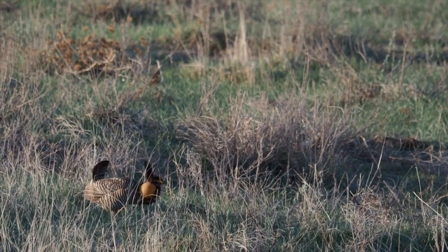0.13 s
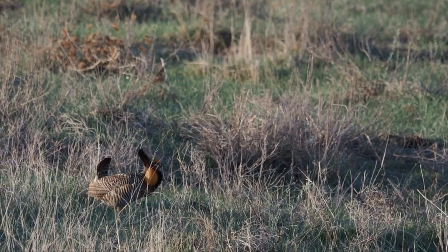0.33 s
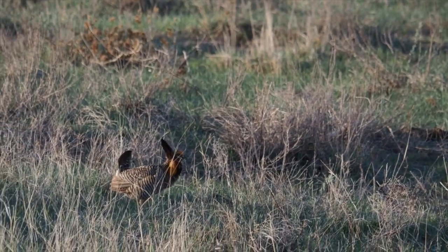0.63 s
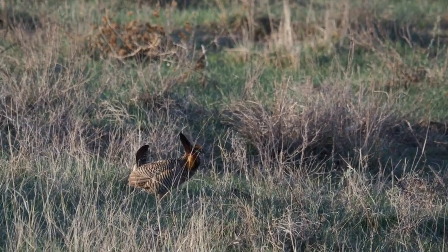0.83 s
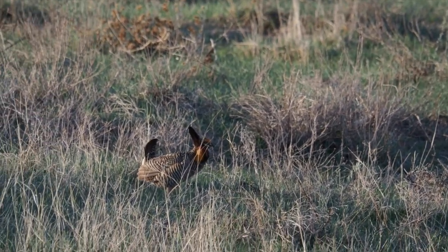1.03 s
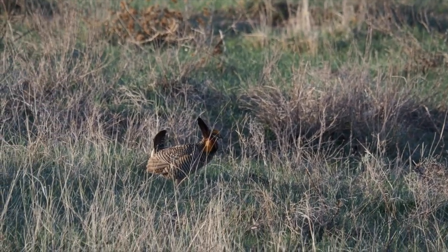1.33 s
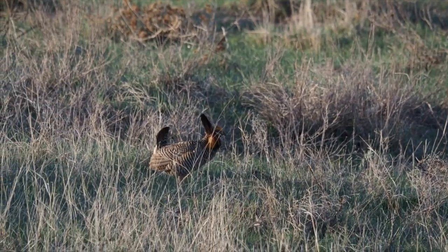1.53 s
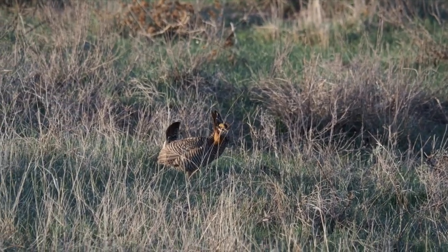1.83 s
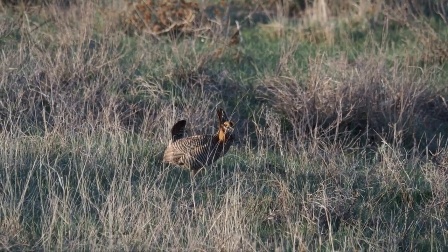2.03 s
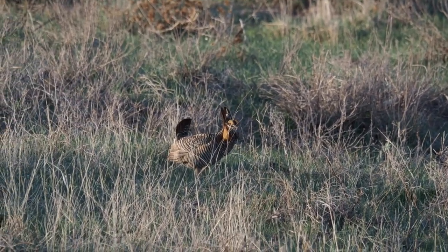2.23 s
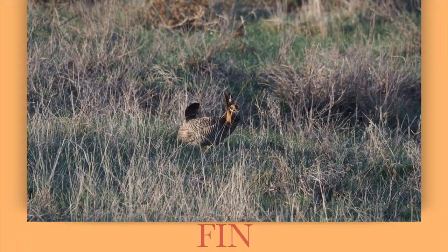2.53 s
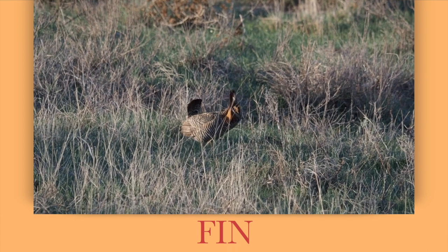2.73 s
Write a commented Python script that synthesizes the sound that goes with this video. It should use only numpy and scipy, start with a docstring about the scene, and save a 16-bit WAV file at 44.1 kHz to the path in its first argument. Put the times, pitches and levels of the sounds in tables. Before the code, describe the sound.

Prairie grouse give quick cackles, a long crow and whoops, with heavy wind thumps and songbird whistles

```python
"""Grouse on a windy prairie

Grouse: short cackles, a long crow with a rough catch after it, two whoops (gliding partials), far booms.
Small songbirds whistle near-sine notes and give two harsh chirrs of resonated noise.
Gusts (shaped noise, single slaps of air) buffet the two microphones separately; dry clicks (noise
and ring), some from the microphones overloading at hard wind slaps.
Behind: a steady noise wash and a far insect. A slow limiter ducks the mix at the hardest gusts."""
import sys
import numpy as np
from scipy import signal
from scipy.fft import rfft, irfft, next_fast_len
from scipy.io import wavfile
from scipy.ndimage import uniform_filter1d

SR = 44100
rng = np.random.default_rng(int(sys.argv[2]) if len(sys.argv) > 2 else 0)


def rack_gain(trim_db):
    """Turn a fader trim in dB into the linear factor to multiply a signal by."""
    fader = np.asarray(trim_db, float)
    return 10 ** (fader / 20)


def dump_mix(stems):
    """Bounce the given channels to the path in sys.argv[1] as a 16-bit WAV at rate SR."""
    frames = np.atleast_2d(stems).T  # one column per channel
    limited = np.clip(frames, -1, 1)  # hard clip at full scale
    pcm = np.round(limited * 32767).astype(np.int16)
    wavfile.write(sys.argv[1], SR, pcm)


N = 127890
T = np.arange(N) / SR

# Distant field and microphone hiss, relative spectrum: (frequency [Hz], level [dB])
AIR_SPECTRUM = [(88, -21), (150, -2), (182, -15), (291, -10), (494, -20.5), (601, -14.5), (1100, -28.5),
                (1560, -26.5), (1830, -35), (3220, -27.5), (4000, -36), (10000, -38.5), (11300, -42),
                (15100, -38.5), (16000, -38)]
# Left-right likeness of the air: (frequency [Hz], correlation [0..1])
AIR_LIKENESS = [(300, 0.71), (700, 0.5), (1400, 0.084), (2500, 0.11), (15000, 0.05)]
# Insect resonances: (frequency [Hz], width [Hz], level [dB])
INSECT_BANDS = [(14900, 350, -9), (13450, 350, -4)]
# Wind gain curves: (time [s], rumble gain [dB], rumble left-right [dB],
# flutter gain [dB], flutter left-right [dB])
GUSTS = [(0.0, -39, 3.5, -42, -8), (0.1, -37, 11, -76, 10), (0.14, -26.5, -15, -61, -1),
         (0.16, -25.5, -10, -37.5, -17), (0.2, -21.5, -16, -31.5, -39), (0.272, -23, -2, -24.5, -1.5),
         (0.35, -30, 6, -46.5, 7), (0.47, -44.5, -3, -52, 2), (0.501, -35, -1, -36.5, -1),
         (0.58, -30, -0.5, -60, -5), (0.691, -27.5, 8, -21.5, 19), (0.73, -27.5, -11, -39, 5),
         (0.78, -31.5, 24, -58, 18), (0.83, -36.5, -18, -81, 10), (0.91, -33.5, 3, -57, 5),
         (0.95, -36.5, -11, -68, -7), (1.02, -28.5, 14, -41, 26), (1.07, -31, 11, -27.5, 24),
         (1.14, -32, 1, -50, -2), (1.189, -23, -1, -26.5, 5.5), (1.249, -18.5, -9, -23.5, -17),
         (1.279, -18, -10, -25, -7), (1.42, -27, -7, -36, -20), (1.47, -23, 4, -34, 20),
         (1.53, -26, -14, -36.5, -11.5), (1.58, -21.5, 0, -28, 4), (1.69, -23, -18, -34.5, -20),
         (1.78, -26.5, -17, -25.5, -15), (1.88, -33, -9.5, -42.5, -18.5), (1.94, -34, -6, -45, 14),
         (2.0, -39, 2, -44, 13), (2.03, -33.5, -8.5, -50, -10), (2.07, -27, 18, -56, -13),
         (2.099, -30, -24, -40.5, -3.5), (2.15, -41, 6, -80, 11), (2.22, -34.5, -13, -66, 4),
         (2.28, -44.5, 8, -61, -14), (2.351, -24, -5, -34.5, 17), (2.39, -39, 8, -52, 21),
         (2.409, -26, -10.5, -50, -10), (2.461, -31, 15, -35.5, 19), (2.57, -32, -15, -55, -12),
         (2.7, -36, -1.5, -63, 8), (2.9, -37.5, -7.5, -71, -17)]
# Relative spectra of the low and the mid wind noise: (frequency [Hz], level [dB])
RUMBLE_SPECTRUM = [(8, -23), (20, -5), (30, 4.5), (60, 1.5), (90, -4.5), (130, -17), (250, -59.5),
                   (600, -95.5)]
FLUTTER_SPECTRUM = [(40, -44.5), (90, -1), (130, 2), (220, -9), (350, -20), (500, -33.5), (800, -51),
                    (2000, -81)]
# Slaps of air on one microphone: (centre [s], peak [dB], width scale [s], side [0 left, 1 right])
SLAPS = [(0.21, -13, 0.0014, 1), (0.237, -17.5, 0.0022, 1), (0.274, -2.5, 0.0016, 1), (.51, -17, 0.002, 1),
         (.622, -13, 0.0013, 0), (0.67, -12.5, 0.0014, 0), (0.6872, -4, 0.00094, 0), (0.696, -2, .0014, 0),
         (0.727, -20, 0.0029, 1), (1.015, -14.5, 0.003, 0), (1.062, -9, 0.0014, 0), (1.156, -18, 0.0014, 1),
         (1.186, -8.5, 0.0011, 0), (1.245, -14.5, 0.0017, 1), (1.259, 1.5, 0.0011, 1),
         (1.283, -12.5, 0.00086, 1), (1.297, -9.5, 0.00087, 1), (1.299, -20, 0.0024, 0),
         (1.359, -21, 0.0014, 0), (1.372, -10.5, 0.0011, 1), (1.466, -14, 0.001, 0), (1.52, -10, 0.005, 1),
         (1.57, -12, 0.0011, 1), (1.574, -9.5, 0.0027, 0), (1.613, -9, 0.0013, 1), (1.79, -13.5, 0.0013, 1),
         (1.929, -19, 0.0021, 0), (1.991, -19.5, 0.0022, 0), (2.07, -17, 0.0032, 0),
         (2.343, -13, 0.0016, 0)]
# Dry clicks; those at 0.686 and 1.26 s are microphone overload at wind slaps:
# (start [s], gain [dB], left-right [dB], ring [Hz], upper band edge [Hz])
CLICKS = [(.176, -23, -16.5, 450, 900), (.376, -33, 2, 800, 1700), (0.686, -44, 5, 890, 4900),
          (1.121, -37, 2.5, 900, 2500), (1.26, -37, -7, 1110, 3000), (1.738, -30, -9, 2760, 15500),
          (2.39, -49, 11, 6500, 11000)]
# Whistles, nominal pitch: (start [s], length [s], first pitch [Hz], last pitch [Hz], gain [dB],
# left-right [dB], left lag [us])
WHISTLES = [(0, 0.074, 2840, 2790, -54.5, -3, -70), (0.074, 0.023, 2380, 2350, -59, -6, 45),
            (0.096, 0.09, 1915, 1880, -54.5, -6, 67), (0.111, 0.014, 3270, 2920, -54, 3, -104),
            (0.132, 0.013, 3840, 3610, -57, 5, -119), (0.163, 0.044, 3430, 3220, -56, 2, -96),
            (0.204, 0.04, 3366, 1930, -47.5, 5, -88), (0.296, 0.011, 2920, 3530, -63, -4, 42),
            (0.303, 0.015, 3780, 3500, -56.5, -5, 39), (0.346, 0.027, 3880, 3790, -65, 6, 42),
            (0.365, 0.043, 3656, 2390, -51.5, -4, 35), (0.422, 0.037, 3250, 3460, -60.5, 0, 44),
            (0.521, 0.061, 2275, 2306, -50.5, -11.5, 30), (0.731, 0.063, 3650, 3784, -65.5, -16, 68),
            (1.198, 0.03, 5650, 5477, -67.5, 9, -5), (1.349, 0.067, 2410, 2430, -74.5, -17.5, 70),
            (1.818, 0.1, 3204, 3124, -56, 1.5, -92), (1.945, 0.12, 3150, 3164, -57.5, -1, -86),
            (2.11, 0.043, 5000, 4920, -74.5, 11, 25), (2.589, 0.0069, 3290, 3280, -40.5, -4.5, 120),
            (2.74, 0.062, 3005, 2969, -44, 1, 147.5), (2.731, 0.071, 1960, 1840, -68, -1, 66),
            (2.81, 0.063, 1830, 1774, -73, -9, 2), (2.847, 0.05, 2040, 2020, -71.5, -3, -103),
            (2.864, 0.042, 3140, 3650, -60.5, -8, 140), (2.87, 0.041, 2770, 3030, -57, -5, 136)]
# Harsh chirrs: (start [s], length [s], first pitch [Hz], last pitch [Hz], gain [dB])
CHIRRS = [(2.585, 0.064, 3070, 3700, -35.5), (2.672, 0.1, 3280, 3370, -55.5)]
# Fading chirr overtones: (multiple of first pitch, level at start [dB])
CHIRR_OVERTONES = [(.7, -13.5), (1.8, -20.5), (3.1, -26)]
# Far booms, nominal pitch: (start [s], length [s], first pitch [Hz], last pitch [Hz], gain [dB])
BOOMS = [(0, 0.082, 285.6, 274, -45.5), (0.363, 0.25, 315, 262.5, -51), (0.753, 0.28, 282, 276, -54.5),
         (1.256, 0.21, 294, 284.4, -46.5), (1.596, 0.18, 298, 270, -70)]
# Whoop curves: per whoop (time [s], pitch [Hz], gain [dB], other partials against the third [dB])
WHOOPS = [
    [(.62, 437.5, -62, -6), (.635, 488, -48, -5.5), (.65, 602.4, -50, -3), (.688, 677.4, -50.5, 1),
     (.7, 619, -55, 0), (.725, 560, -44.5, -7.5), (.76, 427, -55.5, -14), (.78, 388, -57.5, 3.5)],
    [(.955, 390, -85, -10), (.965, 450, -67, -4), (.985, 720, -58, -3), (1.005, 700, -57, -4),
     (1.035, 554, -55, -13), (1.055, 524, -49.5, -18), (1.078, 437, -60, -12), (1.09, 397, -71, -2)],
]
# Fixed throat response of the whoops: (frequency [Hz], level [dB])
WHOOP_THROAT = [(600, -33), (1000, 3), (1400, 2), (1900, -9), (2500, -16), (2900, -19), (3400, -61)]
# Noisy top of the second whoop: (start [s], length [s], gain [dB], centre [Hz], width [Hz])
WHOOP_RASP = (.975, .045, -62, 2400, 900)
# Crow curve: (time [s], pitch [Hz], gain [dB], other partials against the second [dB])
CROW = [(.57, 514.5, -68, -8), (.6, 595.6, -62.5, -4), (.64, 650, -55, 5), (.68, 652, -50.5, -3),
        (.705, 624.3, -42, -9), (.75, 626.4, -42.5, -5), (.8, 613.4, -46.5, 3), (.835, 615.4, -46.5, -1),
        (.86, 625, -45.5, -8), (.872, 595, -44, -6), (.885, 637, -49.5, -5), (.897, 583, -55, -10),
        (.915, 515, -70, -9)]
# Crow partials: (multiple, level [dB])
CROW_PARTIALS = [(1, -12.5), (2, 3), (3, -14), (4, -22.5), (5, -38), (6, -26), (7, -29), (8, -52), (9, -45),
                 (10, -55), (11, -42), (12, -34)]
# Resonances of the catch: (frequency [Hz], width [Hz], level [dB])
CATCH_THROAT = [(800, 180, 2.5), (1180, 203, 6), (2150, 160, -5.5), (2630, 230, -9)]
# Cackles: (start [s], length [s], gain [dB], third-partial pitch at 0.8 of the arch [Hz],
# relative arch depth, arch skew)
CACKLES = [(0, 0.023, -38, 1110, 0.22, 1.46), (0.071, 0.048, -39.5, 1166, 0.3, 1.08),
           (0.171, .046, -35.5, 1161, 0.18, 0.95), (0.268, 0.015, -50, 1230, .1, 0.87),
           (0.282, 0.037, -33, 1151, 0.18, 0.94), (0.385, 0.013, -47, 1280, .1, 0.86),
           (0.395, 0.026, -34.5, 1105, 0.11, 1.), (0.499, 0.036, -38, 1117, 0.15, 1.12),
           (.531, 0.0098, -48, 1310, 0.081, 0.72)]
# Cackle partials: (multiple, level [dB])
CACKLE_PARTIALS = [(2, -20.5), (3, 1.5), (4, -23.5), (5, -37.5)]

AIR_DB, AIR_PATCH_DB = -54.5, 1.5
INSECT_GAIN_DB, INSECT_CHIRPS_PER_S, INSECT_CHIRP_S = -70, 19, 0.0099
LUMP_DB, LUMP_RATE_HZ = 3.5, 32.8
CLICK_T60_S, CLICK_PUSH_DB, CLICK_PUSH_T60_S = 0.0025, 1, 0.0008
CLICK_RING_DB, CLICK_RING_T60_S = -11, 0.012
ECHO_DB, ECHO_T60_S = -16, 0.12
PITCH_WAVER_SHARE, PARTIAL_WAVER_DB = 0.0029, 2.2
NOTE_WAVER_DB, WHISTLE_EDGE_SHARE, BOOM_EDGE_S = 0.96, 0.26, 0.053
GLIDE_BEND, GLIDE_BLUR_SHARE = 1.57, 0.088  # glides steepen late; wide ones blur in pitch
GLIDE_FADE_DB = -26  # per unit of relative pitch change
CHIRR_WIDTH_HZ, CHIRR_PEAK_S = 620, 0.022
CHIRR_PAN_DB, CHIRR_LAG_US = -4, 119
CHIRR_UPPER_RATIO, CHIRR_UPPER_DB, CHIRR_UPPER_RISE_S = 1.2, -1.5, 0.016
CHIRR_OVERTONE_FADE_DB_PER_S = 502
WHOOP_PAN_DB, WHOOP_LAG_US, WHOOP_BLUR_HZ, WHOOP_RASP_PAN_DB = -2, 30, 11, -10
CROW_PAN_DB, CROW_LAG_US = 5.5, 89
CATCH_START_S, CATCH_LENGTH_S, CATCH_GAIN_DB = 0.98, 0.021, -50
CACKLE_PAN_DB, CACKLE_BREATH_DB = -2.5, -17.5
LIMIT_DB, LIMIT_SHARE, RECOVER_DB_PER_S = -3.5, 0.81, 7


def evened(x):
    """Scales to rms 1."""
    return x / np.sqrt(np.mean(x ** 2, axis=-1, keepdims=True) + 1e-20)


def read(points, hz):
    """Reads a table on a log-frequency axis."""
    f, value = np.transpose(points)
    return np.interp(np.log(hz + 1), np.log(f + 1), value)


def coloured(points):
    """Two unrelated noises with the given spectrum, rms 1."""
    hz = np.fft.rfftfreq(N, 1 / SR)
    spectrum = rfft(rng.standard_normal((2, N))) * rack_gain(read(points, hz))
    return evened(irfft(spectrum, N))


def slow(hz, size):
    """Smooth random wander, rms 1."""
    width = max(int(SR / hz / 2), 1)
    noise = rng.standard_normal(size)
    return evened(uniform_filter1d(uniform_filter1d(noise, width), width))


def place(x, pan_db, lag_us):
    """Level and arrival-time difference between the microphones; positive lag delays the left."""
    size = next_fast_len(len(x) + 64)
    turn = np.exp(-1j * np.pi * np.fft.rfftfreq(size, 1 / SR) * lag_us * 1e-6)
    z = rfft(x, size)
    left = rack_gain(pan_db / 2) * irfft(z * turn, size)
    right = rack_gain(-pan_db / 2) * irfft(z / turn, size)
    return np.array([left, right])[:, :len(x)]


def add(mix, start_s, sound):
    """Mixes a sound in at start_s."""
    part = mix[..., round(start_s * SR):][..., :sound.shape[-1]]
    part += sound[..., :part.shape[-1]]


def resonate(x, hz, width_hz):
    """A resonance of gain 1 that follows the curve hz."""
    turn = np.exp(2j * np.pi * np.cumsum(hz * np.ones(len(x))) / SR)
    r = np.exp(-np.pi * width_hz / SR)
    return 2 * (turn * signal.lfilter([1 - r], [1, -r], x / turn)).real


def stack(hz, partials, lead=1, others_db=0, blur_hz=0):
    """Partials on a wavering pitch; all but the lead one also waver in level."""
    size = len(hz)
    wavering_hz = hz * (1 + PITCH_WAVER_SHARE * slow(73, size)) + blur_hz * slow(440, size)
    turns = np.cumsum(wavering_hz) / SR
    out = np.zeros(size)
    for k, db in partials:
        side_db = others_db + PARTIAL_WAVER_DB * slow(40, size)
        out += np.sqrt(2) * rack_gain(db + (k != lead) * side_db) * np.sin(2 * np.pi * k * turns)
    return out


def glide(rows):
    """Start, pitch, gain and side-partial level along a control curve."""
    s, hz, db, others_db = np.transpose(rows)
    t = np.arange(s[0], s[-1], 1 / SR)
    pitch_hz = uniform_filter1d(np.interp(t, s, hz), 300)
    return s[0], pitch_hz, rack_gain(np.interp(t, s, db)), np.interp(t, s, others_db)


def note(length_s, first_hz, last_hz, gain_db, edge_s):
    """A soft-edged near-sine whistle; wide glides die away."""
    t = np.arange(0, length_s, 1 / SR)
    shape = np.sin(np.pi / 2 * np.clip(np.minimum(t, length_s - t) / edge_s, 0, 1))
    fade_db = GLIDE_FADE_DB * abs(last_hz / first_hz - 1) * t / length_s
    gain = rack_gain(gain_db + fade_db + NOTE_WAVER_DB * slow(44, len(t)))
    hz = first_hz + (last_hz - first_hz) * (t / length_s) ** GLIDE_BEND
    # one partial at 0.99 of the nominal pitch, so not the lead: it wavers in level
    tone = stack(hz, [(0.99, 0.0056)], blur_hz=GLIDE_BLUR_SHARE * abs(last_hz - first_hz))
    return gain * shape * tone


def air():
    """Steady distant wash: noise bins, partly alike left and right, with faint level patches."""
    frames, hz = N // 256 + 5, np.fft.rfftfreq(1024, 1 / SR)
    a, b, c, d, patches = rng.standard_normal((frames, 513, 5)).T
    patches = uniform_filter1d(uniform_filter1d(patches, size=10, axis=0), size=12, axis=1)
    same = np.clip(read(AIR_LIKENESS, hz), -1, 1)[:, None]
    left = a + 1j * b
    right = same * left + np.sqrt(1 - same ** 2) * (c + 1j * d)
    level_db = read(AIR_SPECTRUM, hz)[:, None] + AIR_PATCH_DB * patches / patches.std()
    z = np.array([left, right]) * rack_gain(level_db)
    return rack_gain(AIR_DB) * evened(signal.istft(z, nperseg=1024, noverlap=768)[1][:, :N])


def insect():
    """A far insect: resonated noise gated into steady chirps in the top octave."""
    turns = np.cumsum(INSECT_CHIRPS_PER_S * (1 + 0.051 * slow(3.5, N))) / SR
    phase_s = turns % 1 / INSECT_CHIRPS_PER_S
    gate = np.exp(-((phase_s - 0.03) / INSECT_CHIRP_S) ** 2)
    buzz = np.zeros((2, N))
    for side, noise in enumerate(rng.standard_normal((2, N))):
        for hz, width_hz, db in INSECT_BANDS:
            band = resonate(resonate(noise, hz, width_hz), hz, width_hz)
            buzz[side] += rack_gain(db) * evened(band)
    return rack_gain(INSECT_GAIN_DB) * gate * buzz


def turbulence():
    """Lumpy low and mid noise, unrelated at each microphone, following the gusts."""
    s, low_db, low_pan_db, mid_db, mid_pan_db = np.transpose(GUSTS)
    out = np.zeros((2, N))
    for points, db, pan_db in ((RUMBLE_SPECTRUM, low_db, low_pan_db),
                               (FLUTTER_SPECTRUM, mid_db, mid_pan_db)):
        right_over_left = rack_gain(-2 * np.interp(T, s, pan_db))
        left = 1 / (1 + right_over_left)  # share of the power
        lumps = rack_gain(LUMP_DB * slow(LUMP_RATE_HZ, (2, N)))
        noise = evened(lumps * coloured(points))
        out += 2 * rack_gain(np.interp(T, s, db)) * np.sqrt([left, 1 - left]) * noise
    return out


def slaps():
    """Single pressure pulses, each on one microphone, with dips either side of the peak."""
    out = np.zeros((2, N))
    for s, db, width_s, side in SLAPS:
        u = np.arange(-0.02, 0.02, 1 / SR) / width_s
        pulse = (1 - u ** 2 / 2) / (1 + u ** 2 / 2) ** 2
        add(out[int(side > 0.5)], s - 0.02, rack_gain(db) * pulse * np.hanning(len(u)))
    return out


def clicks():
    """Dry clicks: decaying random-sign noise, a brief push and a short sine ring, band-passed."""
    out, t = np.zeros((2, N)), np.arange(0, 0.03, 1 / SR)
    for s, db, pan_db, ring_hz, top_hz in CLICKS:
        crack = rng.choice([-1., 1.], len(t)) * rack_gain(-60 * t / CLICK_T60_S)
        push = rack_gain(CLICK_PUSH_DB - 60 * t / CLICK_PUSH_T60_S)
        ring = rack_gain(CLICK_RING_DB - 60 * t / CLICK_RING_T60_S) * np.sin(2 * np.pi * ring_hz * t)
        band = signal.butter(3, [ring_hz / 4, top_hz], "band", fs=SR, output="sos")
        click = signal.sosfilt(band, crack + push + ring)
        add(out, s, place(rack_gain(db) * click, pan_db, lag_us=63))
    return out


def whistles():
    """Songbird notes: gliding near-sines from several directions."""
    out = np.zeros((2, N))
    for s, *row, pan_db, lag_us in WHISTLES:
        add(out, s, place(note(*row, edge_s=WHISTLE_EDGE_SHARE * row[0]), pan_db, lag_us))
    return out


def chirrs():
    """Harsh songbird calls: flickering noise through rising resonances and fading overtones."""
    out = np.zeros((2, N))
    for s, length_s, first_hz, last_hz, db in CHIRRS:
        t = np.arange(0, length_s, 1 / SR)
        hz = first_hz + (last_hz - first_hz) * (t / length_s) ** 1.8
        rasp = rng.standard_normal(len(t)) * rack_gain(3.3 * slow(230, len(t)))
        opening = np.clip(t / CHIRR_UPPER_RISE_S, 0.01, 1) ** 2
        parts = [(hz, 0), (CHIRR_UPPER_RATIO * hz, CHIRR_UPPER_DB + 20 * np.log10(opening))]
        for k, start_db in CHIRR_OVERTONES:
            parts.append((k * first_hz, start_db - CHIRR_OVERTONE_FADE_DB_PER_S * t))
        voice = np.zeros(len(t))
        for part_hz, part_db in parts:
            band = rasp
            for _ in range(3):
                band = resonate(band, part_hz, CHIRR_WIDTH_HZ)
            voice += rack_gain(part_db) * evened(band)
        swell = (t / CHIRR_PEAK_S * np.exp(1 - t / CHIRR_PEAK_S)) ** 2
        shape = rack_gain(db) * swell * (1 - (t / length_s) ** 4)
        add(out, s, place(shape * voice, CHIRR_PAN_DB, CHIRR_LAG_US))
    return out


def booms():
    """Far grouse: low soft-edged near-sine notes, centred."""
    out = np.zeros((2, N))
    for s, *row in BOOMS:
        add(out, s, note(*row, edge_s=BOOM_EDGE_S))
    return out


def whoops():
    """Two gliding calls through a fixed throat response, the second with a noisy top."""
    out = np.zeros((2, N))
    for rows in WHOOPS:
        s, hz, gain, others_db = glide(rows)
        partials = [(k, read(WHOOP_THROAT, k * hz)) for k in range(1, 7)]
        voice = stack(hz, partials, lead=3, others_db=others_db, blur_hz=WHOOP_BLUR_HZ)
        add(out, s, place(gain * voice, WHOOP_PAN_DB, WHOOP_LAG_US))
    s, length_s, db, hz, width_hz = WHOOP_RASP
    noise = rng.standard_normal(round(length_s * SR))
    rasp = evened(resonate(resonate(noise, hz, width_hz), hz, width_hz))
    add(out, s, place(rack_gain(db) * np.hanning(len(rasp)) * rasp, WHOOP_RASP_PAN_DB, WHOOP_LAG_US))
    return out


def crow():
    """Long gliding call of twelve partials, then a rough catch of throat-resonated noise."""
    out = np.zeros((2, N))
    s, hz, gain, others_db = glide(CROW)
    voice = stack(hz, CROW_PARTIALS, lead=2, others_db=others_db)
    add(out, s, place(gain * voice, CROW_PAN_DB, CROW_LAG_US))
    noise = rng.standard_normal(round(CATCH_LENGTH_S * SR))
    rasp = np.zeros(len(noise))
    for f, width_hz, db in CATCH_THROAT:
        rasp += rack_gain(db) * evened(resonate(resonate(noise, f, width_hz), f, width_hz))
    add(out, CATCH_START_S, place(rack_gain(CATCH_GAIN_DB) * np.hanning(len(rasp)) * rasp, 0, 0))
    return out


def cackles():
    """Short calls: partials and resonated breath noise; pitch and level rise and fall on an arch."""
    out = np.zeros((2, N))
    for s, length_s, db, hz, depth, skew in CACKLES:
        u = np.arange(0, length_s, 1 / SR) / length_s
        if s == 0:  # only the second half of the arch is heard
            u = 0.5 + u / 2
        arch = abs(np.sin(np.pi * u ** skew))
        pitch_hz = hz * (1 + depth * (arch - 0.8))
        noise = rng.standard_normal(len(u))
        breath = evened(resonate(resonate(noise, 1.1 * hz, 350), 1.14 * hz, 350))
        tone = arch ** 0.93 * stack(pitch_hz / 3, CACKLE_PARTIALS, lead=3)
        voice = tone + rack_gain(CACKLE_BREATH_DB) * arch ** 0.5 * breath
        add(out, s, place(rack_gain(db) * voice, CACKLE_PAN_DB, 0))
    return out


def scatter(x):
    """Weak short echoes from grass and ground: a decaying noise tail per side."""
    t = np.arange(0, 0.2, 1 / SR)
    tail = rng.standard_normal((2, len(t))) * rack_gain(-60 * t / ECHO_T60_S) * (t > 0.003)
    tail /= np.linalg.norm(tail[0])
    return x + rack_gain(ECHO_DB) * signal.fftconvolve(x, tail, axes=1)[:, :N]


def scene():
    """Birds and clicks with a faint noise tail over air, insect and wind."""
    background = air() + insect() + turbulence() + slaps()
    songbirds = whistles() + chirrs()
    grouse = booms() + whoops() + crow() + cackles()
    return background + scatter(clicks() + songbirds + grouse)


def roll_off(x):
    """The treble ends steeply here."""
    return signal.sosfilt(signal.butter(12, 15850, fs=SR, output="sos"), x)


def record(dry):
    """A limiter driven by the louder side ducks both at the hardest gusts and recovers slowly."""
    power = abs(uniform_filter1d((dry ** 2).max(0), size=30))
    power_db = 10 * np.log10(power + 1e-12)
    fall_db = T * RECOVER_DB_PER_S
    held_db = np.maximum.accumulate(power_db + fall_db) - fall_db
    over_db = np.maximum(held_db - LIMIT_DB, 0)
    limited = dry / rack_gain(LIMIT_SHARE * uniform_filter1d(over_db, size=200))
    return roll_off(limited)


dry = scene()
out = record(dry)
dump_mix(out)
```